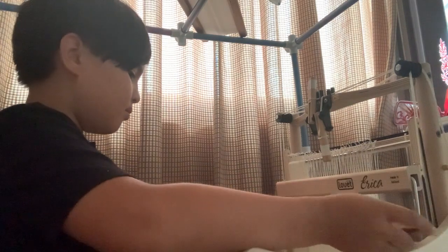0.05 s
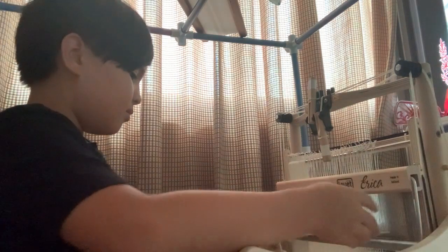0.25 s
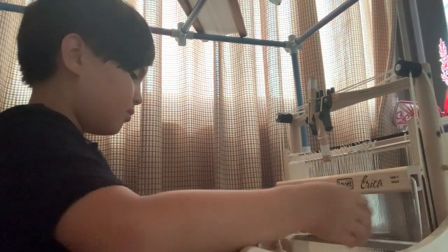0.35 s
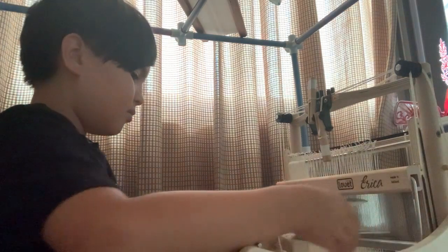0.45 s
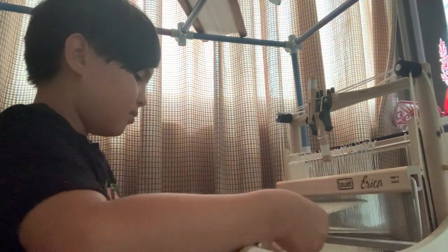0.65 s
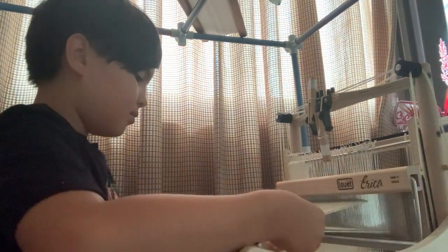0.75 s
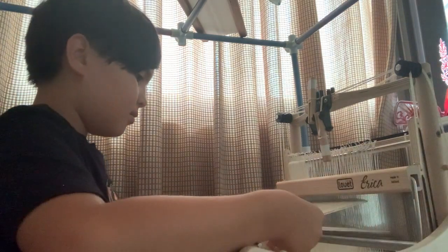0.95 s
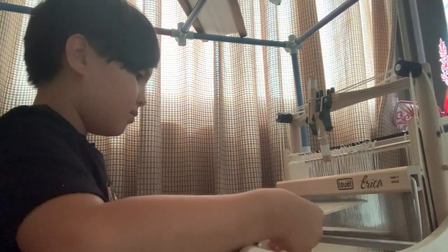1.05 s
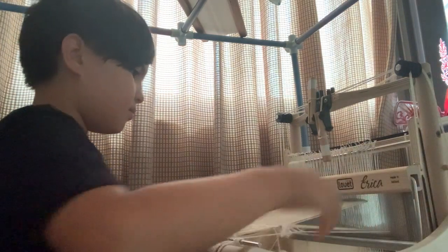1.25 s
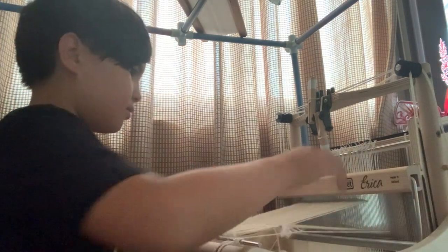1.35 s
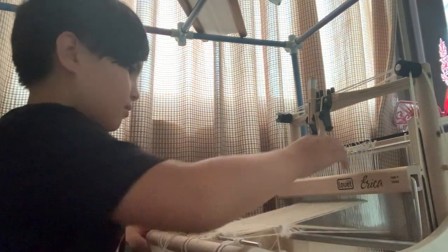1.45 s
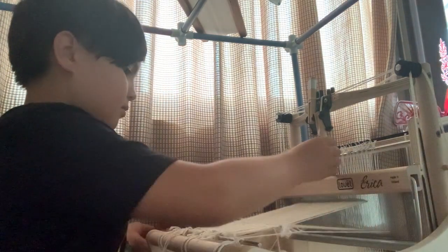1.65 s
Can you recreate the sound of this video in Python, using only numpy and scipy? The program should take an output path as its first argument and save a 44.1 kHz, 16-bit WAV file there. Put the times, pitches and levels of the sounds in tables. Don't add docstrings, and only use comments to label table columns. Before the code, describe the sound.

A wooden loom shuttle lightly touches the frame at 0.14 seconds, then clacks loudly and brightly on the beam at 0.24, with a short gritty rub, and bounces at 0.30. A small low table thump sits underneath. A soft knock comes at 0.51, then faint metal ticks near 0.9, 1.1 and 1.23. Small room, close phone microphone, quiet low hum and hiss.

```python
import sys
import numpy as np
from scipy import signal
from scipy.fft import rfft, irfft
from scipy.io import wavfile
from scipy.ndimage import uniform_filter1d

SR = 44100
rng = np.random.default_rng(int(sys.argv[2]) if len(sys.argv) > 2 else 0)


def store_wav(level_fs):
    pcm = np.round(np.clip(np.atleast_2d(level_fs), -1, 1) * 32767)
    wavfile.write(sys.argv[1], SR, pcm.T.astype(np.int16))


def invert_db(level):
    return 10 ** (np.asarray(level, dtype=float) / 20)


N = 74970

# (frequency [Hz], density [dB per Hz])
FLOOR_SPECTRUM = [(82, -35.5), (140, -9), (249, -13.5), (400, -14.5), (488, -18), (1370, -27.5),
                  (3550, -31.5), (14500, -32), (16000, -22.5)]
# (frequency [Hz], width [Hz], level [dB])
HUMS = [(58, 22, -73), (78.6, 14, -79), (113.2, 7.4, -79)]

# (time [s], level [dB])
RUB_LEVEL = [(0.0, -84.5), (0.122, -69), (0.17, -62.5), (0.246, -62.5), (0.298, -50.5), (0.392, -63),
             (0.554, -69.5), (0.666, -76), (0.908, -78.5), (1.226, -73.5), (1.444, -85.5), (1.7, -99)]
# (frequency [Hz], width [Hz], level [dB])
REED_RESONANCES = [(1706, 140, -9.5), (2370, 90, -12.5), (3556, 390, -9), (3610, 37, -12.5),
                   (7250, 90, -13)]
# (frequency [Hz], density [dB per Hz])
WARP_RUSTLE = [(200, -10), (600, -3.5), (2000, -5), (5000, -8.5), (10000, -24.5), (14000, -15.5),
               (16000, -11)]

# (time [s], level [dB], chatter [s], bright crack [dB], tilt [dB per octave])
SIDE_TOUCHES = [
    (.1136, -68, 0.0079, -15.5, 7.5),
    (.1365, -62, 0.0013, -12, 0),
    (.1388, -44, 0.00075, 4, 0.5),
    (.1410, -41.5, 0.00072, -5.5, 0),
    (.1455, -53, 0.001, -16, -1),
]
# (frequency [Hz], level [dB], t60 [s])
SIDE_MODES = [(600, -13, 0.016), (791, -9.5, 0.022), (1160, -8.5, .015), (1430, -5.5, 0.051),
              (2380, -14, .02), (3600, -3, 0.018), (3725, 4, 0.045), (4390, -6.5, .02),
              (5400, -10.5, 0.028), (7500, -5.5, 0.0097), (8930, -12.5, 0.012), (10130, -11, .012),
              (11800, -11, 0.014), (14300, -12.5, .012)]
# (time [s], level [dB], chatter [s], bright crack [dB], tilt [dB per octave])
FRAME_KNOCKS = [
    (.5095, -61.5, 0.0012, 4.5, 4),
    (.5118, -53.5, 0.00085, -2, -3),
    (.5140, -52, 0.00063, -8, -1),
    (.5155, -60, .0006, -3, -5.5),
    (.7425, -63, 0.002, -3, -6),
    (.7750, -67, 0.0048, -7, -6),
    (1.2485, -64, 0.002, -8, -6),
    (1.2520, -62, 0.0025, -4, 1),
]
# (frequency [Hz], level [dB], t60 [s])
FRAME_MODES = [(657, -6, 0.023), (773, -5, 0.032), (1206, -9, 0.018), (1485, -6, 0.04), (1720, -9, 0.018),
               (2360, -3, 0.031), (3480, 4, 0.014), (3643, 2.5, 0.046), (5500, -4, 0.017),
               (6270, -14, 0.02), (7300, -5, 0.031), (9600, -14, 0.01)]
# (frequency [Hz], density [dB per Hz])
FRAME_CRACK = [(500, -11.5), (1500, -5), (3300, 12), (8000, 9), (10500, 3), (13000, 8), (16000, 6)]

# (frequency [Hz], t60 [s], level [dB])
ROOM_DECAY = [(250, 0.25, -7), (704, 0.56, -11), (1467, 0.42, -13), (2940, 0.47, -10), (5860, 0.37, -3),
              (10000, 0.28, -1), (15100, .3, 0.5)]

# (time [s], level [dB], chatter [s], bright crack [dB], tilt [dB per octave])
BEAM_CLACKS = [
    (.2305, -46, 0.0012, -28.5, -7),
    (.2333, -41.5, 0.00052, -23.5, 3.5),
    (.2350, -28, 0.00086, 0.5, 5),
    (.2364, -24.5, 0.00059, -13, 0.5),
    (.2375, -24.5, .0005, -12.5, -2),
    (.2388, -21.5, 0.0003, -11, -1.5),
    (.2414, -26, 0.00088, -12, -0.5),
    (.2440, -31.5, 0.0016, -15, 0.5),
    (.2485, -32.5, 0.0013, -22, -2),
]
# (frequency [Hz], level [dB], t60 [s])
BEAM_MODES = [(365.5, -17, 0.031), (505, -13, 0.028), (820, -12, 0.015), (990, -9.5, 0.023),
              (1155, -13, .02), (1435, -1.5, 0.018), (1747, -6.5, 0.048), (2032, -9, 0.057),
              (2259, -2, 0.03), (2437, -5, 0.022), (2594, -6.5, 0.041), (2915, -4, 0.015), (3625, -7, 0.03),
              (7290, -19.5, 0.015)]
# (frequency [Hz], level [dB], t60 [s])
SHUTTLE_MODES = [(645, -14.5, 0.017), (3220, -10, .015), (4180, -11, 0.017), (4644, -10, 0.023),
                 (5230, -12, 0.015), (5920, -16, 0.017)]
# (time [s], level [dB], chatter [s], bright crack [dB], tilt [dB per octave])
BEAM_BOUNCES = [
    (.3010, -28.5, 0.00045, -4.5, 0),
    (.3028, -29.5, 0.00104, -10.5, -1),
    (.3075, -39.5, 0.0015, -14, -5.5),
    (.3120, -43.5, 0.0008, -24, -2.5),
]
# (frequency [Hz], level [dB], t60 [s])
BEAM_END_MODES = [(543, -11, 0.012), (734, -19, 0.014), (960, -7.5, 0.018), (1460, -4, 0.026),
                  (1750, -4.5, 0.023), (2120, -7, 0.0087), (2296, -2.5, .03), (2560, -12, 0.027),
                  (2920, -11.5, 0.021), (3110, -7, .015), (3565, -9.5, .02), (4770, -12.5, 0.01498),
                  (6250, -9.5, 0.011), (7600, -20.5, 0.024)]
# (time [s], level [dB], chatter [s], bright crack [dB], tilt [dB per octave])
REED_FLICKS = [
    (.2590, -44.5, .003, -21, 3),
    (.2670, -47.5, .001, -11.5, 1),
    (.2735, -40.5, .003, -23.5, -1.5),
    (.3245, -50, .003, -12, 7.5),
    (.5490, -65, 0.0034, -14, 6),
]
# (frequency [Hz], level [dB], t60 [s])
REED_MODES = [(2340, -1.5, .03), (3620, 2.5, 0.092), (4700, -10, 0.017)]
# (frequency [Hz], density [dB per Hz])
BEAM_CRACK = [(300, -14), (700, -5.5), (1600, 5.5), (3000, 13), (6000, 8.5), (9000, 4.5), (13000, -3.5),
              (16000, -2)]

# (time [s], frequency [Hz], level [dB], rise [s], t60 [s])
TABLE_THUMPS = [
    (.24, 165, -46, .01, .12),
    (.25, 101.6, -48.5, .03, .2),
]

# (time [s], level [dB], chatter [s], bright crack [dB], tilt [dB per octave])
HEDDLE_TICKS = [
    (.6820, -65.5, 0.001, -2.5, -3),
    (.8885, -56.5, 0.0017, -1, 2.5),
    (1.0256, -63.5, 0.0021, -12, -3.5),
    (1.0823, -60.5, 0.00078, -9, -0.5),
    (1.0902, -55, 0.0011, -4.5, 0),
    (1.1150, -65, 0.0023, -8, -2),
    (1.1310, -66, 0.0035, -6, -7),
    (1.1500, -65.5, 0.004, -12, 0),
]
# (frequency [Hz], level [dB], t60 [s])
HEDDLE_MODES = [(1750, -6, 0.047), (2450, -10, 0.071), (3352, -1.5, 0.039), (3630, -2, 0.043),
                (4430, -1.5, 0.015), (4985, 0.5, 0.029), (5320, -0.5, 0.017), (5630, 1, 0.022),
                (6820, -1, 0.03), (7650, -8, .015), (7697, 5.5, 0.034), (8440, -8, 0.017),
                (8800, -12, 0.02), (11550, -10, 0.044)]
# (time [s], level [dB], chatter [s], bright crack [dB], tilt [dB per octave])
BAR_TICKS = [
    (1.2228, -56, 0.0024, -2, 3),
    (1.2433, -66, .0004, 10, -2),
    (1.2474, -65.5, 0.00033, 7.5, 4.5),
    (1.2494, -62, 0.00026, 3, -2.5),
    (1.2535, -66, .0006, 4, 0),
]
# (frequency [Hz], level [dB], t60 [s])
BAR_MODES = [(1740, -2.5, 0.053), (2370, -10, 0.011), (3390, -7.5, 0.072), (3734, 2, 0.052),
             (4440, -3, .02), (5064, 4, .03), (5630, 3.5, 0.018), (6300, -2, 0.011), (7100, -6, 0.019),
             (7520, 5.5, 0.012), (9460, -15, 0.01), (10340, -8, 0.011), (12000, -19, 0.022)]
# (frequency [Hz], density [dB per Hz])
HEDDLE_CRACK = [(1500, 8.5), (3000, 7.5), (5500, -16), (9000, 10.5), (13000, 2.5), (16000, -14)]


def at_hz(points, hz, axis=1):
    points = np.array(points)
    return np.interp(np.log(hz), np.log(points[:, 0]), points[:, axis])


def rms_one(x):
    return x / np.sqrt(np.mean(x ** 2) + 1e-20)


def colour(x, points):
    hz = np.fft.rfftfreq(len(x), 1 / SR) + 1
    return irfft(rfft(x) * invert_db(at_hz(points, hz)), len(x))


def resonate(x, hz, width):
    r = np.exp(-np.pi * width / SR)
    poles = [1, -2 * r * np.cos(2 * np.pi * hz / SR), r * r]
    return signal.lfilter([(1 - r * r) / 2, 0, (r * r - 1) / 2], poles, x)


def thin(x, low_hz):
    return signal.sosfilt(signal.butter(4, low_hz, "high", fs=SR, output="sos"), x)


def ring(push, modes):
    ring_share = 0.76
    out = np.zeros(N)
    for (hz, db, t60), p in zip(modes, push):
        r = invert_db(-60 / (ring_share * t60 * SR))
        poles = [1, -2 * r * np.cos(2 * np.pi * hz / SR), r * r]
        sign = rng.choice([-1, 1])
        out = out + invert_db(db + 0.5) * sign * signal.lfilter([.5, 0, -.5], poles, p[:N])
    return out


def struck(hits, modes, crack_colour, spread_db):
    length = 600
    age = np.arange(length) / SR
    mode_hz = np.array(modes)[:, 0]
    chatter = rng.standard_normal((len(hits), 2, length))
    vary = rng.standard_normal((len(hits), len(modes)))
    push = np.full((len(modes), N + length), 1e-18)
    crack = np.zeros(N + length)
    for (s, db, chatter_s, crack_db, tilt), (a, b), v in zip(hits, chatter, vary):
        start = int(s * SR)
        at = slice(start, start + length)
        shape = np.exp(-age / max(chatter_s, 1e-4))

        force = np.abs(a) * shape ** 3
        phase = 9 * a[-len(modes):, None]
        felt = force * np.cos(2 * np.pi * mode_hz[:, None] * age + phase)
        gain = invert_db(db + spread_db * v + tilt * np.log2(mode_hz / 2000)) * 2 / np.sum(force)
        push[:, at] += gain[:, None] * felt

        burst = rfft(b * shape)
        even = irfft(burst / uniform_filter1d(np.abs(burst), size=9), length) * np.exp(-age / .006)
        crack[at] += invert_db(db + crack_db) * even * np.sqrt(np.sum(shape ** 2) / np.sum(even ** 2))
    return colour(crack[:N], crack_colour) + ring(push, modes)


def background():
    mains_hz, mains_db, floor_db = 122.5, -69.5, -68.5
    white = rng.standard_normal((4, N + SR))
    hums = np.zeros(N)
    for (hz, width, db), w in zip(HUMS, white):
        twice = resonate(resonate(w, hz, width), hz, width)
        hums = hums + invert_db(db) * rms_one(twice[SR:])
    hiss = thin(colour(white[3], FLOOR_SPECTRUM), low_hz=50)[SR:]
    mains = invert_db(mains_db) * np.sqrt(2) * np.sin(2 * np.pi * mains_hz * np.arange(N) / SR)
    return mains + hums + invert_db(floor_db) * rms_one(hiss)


def reed_rub():
    grit_per_s, rub_db, rustle_db = 4100, -1, 2
    grains = (rng.random(N) < grit_per_s / SR) * rng.standard_normal(N)
    grit = grains * invert_db(0.9 * rng.exponential(1, N))
    reed = np.zeros(N)
    for hz, width, db in REED_RESONANCES:
        reed = reed + invert_db(db) * rms_one(resonate(grit, hz, width))
    rustle = invert_db(rustle_db) * rms_one(colour(rng.standard_normal(N), WARP_RUSTLE))
    s, db = np.transpose(RUB_LEVEL)
    level = invert_db(rub_db + np.interp(np.arange(N) / SR, s, db))
    return level * (rms_one(reed) + rustle)


def frame():
    knocks = struck(FRAME_KNOCKS, FRAME_MODES, FRAME_CRACK, spread_db=2.9)
    touches = struck(SIDE_TOUCHES, SIDE_MODES, FRAME_CRACK, spread_db=3.5)
    return thin(knocks + touches, low_hz=480)


def room(x):
    first_wall_s, build_s = .017, .002
    near_db, near_t60_s = 8.5, .05
    age = np.arange(SR) / SR
    edges = 150 * 2 ** np.arange(0, 7.1, .5)
    white = rng.standard_normal((2, SR))
    tail = np.zeros(SR)
    for k, (low, high) in enumerate(zip(edges, edges[1:])):
        hz = np.sqrt(low * high)
        sos = signal.butter(2, [low, high], "band", fs=SR, output="sos")
        fade = invert_db(at_hz(ROOM_DECAY, hz, axis=2) - 60 * age / at_hz(ROOM_DECAY, hz))
        tail = tail + signal.sosfilt(sos, white[k % 2]) * fade
    far = 1 - np.exp(-np.maximum(age - first_wall_s, 0) / build_s)
    near = invert_db(near_db - 60 * age / near_t60_s)
    return signal.fftconvolve(x, tail * (far + near) / np.sqrt(SR / 40))[:N]


def beam():
    clacks = struck(BEAM_CLACKS, BEAM_MODES + SHUTTLE_MODES, BEAM_CRACK, spread_db=1.5)
    bounces = struck(BEAM_BOUNCES, BEAM_END_MODES, BEAM_CRACK, spread_db=-1.6)
    flicks = struck(REED_FLICKS, REED_MODES, BEAM_CRACK, spread_db=3.5)
    return thin(clacks, low_hz=296) + thin(bounces, low_hz=407) + flicks


def table_thumps():
    out = np.zeros(N)
    for s, hz, db, rise, t60 in TABLE_THUMPS:
        t = np.maximum(np.arange(N) / SR - s, 0)
        swell = 1 - np.exp(-t / rise)
        out = out + invert_db(db - 60 * t / t60) * swell * np.sin(2 * np.pi * hz * t)
    return out


def heddles():
    ticks = struck(HEDDLE_TICKS, HEDDLE_MODES, HEDDLE_CRACK, spread_db=2.5)
    bar_ticks = struck(BAR_TICKS, BAR_MODES, HEDDLE_CRACK, spread_db=0.5)
    return thin(ticks + bar_ticks, low_hz=1600)


def scene():
    loom = beam() + frame() + heddles()
    mix = loom + room(loom) + table_thumps() + reed_rub() + background()
    return mix[None]


def roll_off(x):
    return signal.sosfilt(signal.butter(12, 16740, fs=SR, output="sos"), x)


def record(dry):
    top_hz, cutoff_hz = 16900, 15950
    first = signal.cheby2(12, 50, top_hz, fs=SR, output="sos")
    second = signal.cheby2(16, 28, cutoff_hz, fs=SR, output="sos")
    mix = signal.sosfilt(second, signal.sosfilt(first, dry))
    return roll_off(mix)


dry = scene()
out = record(dry)
store_wav(out)
```